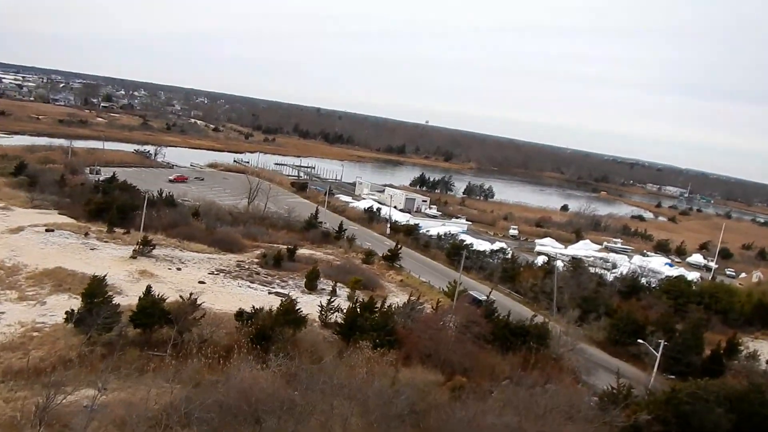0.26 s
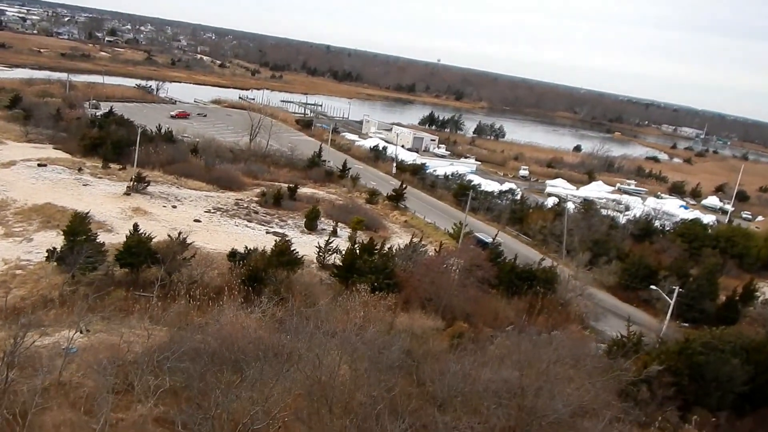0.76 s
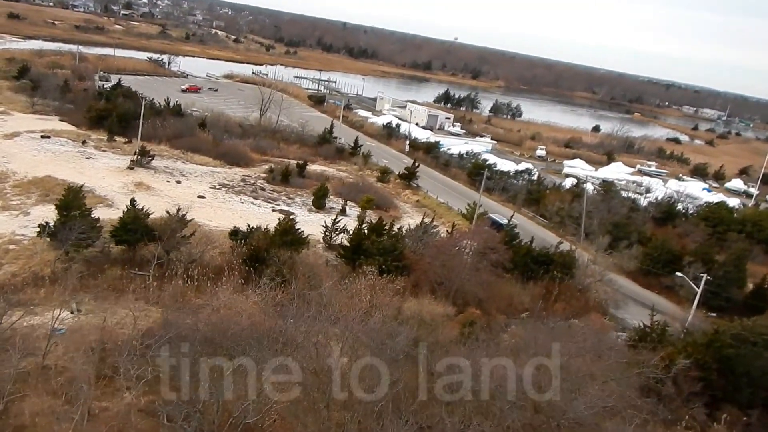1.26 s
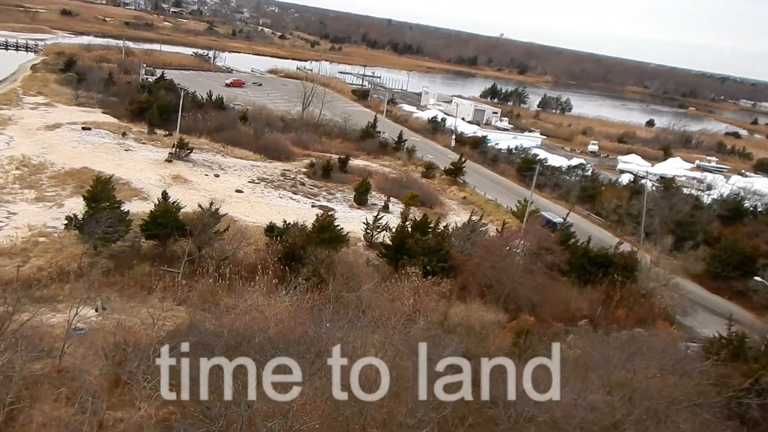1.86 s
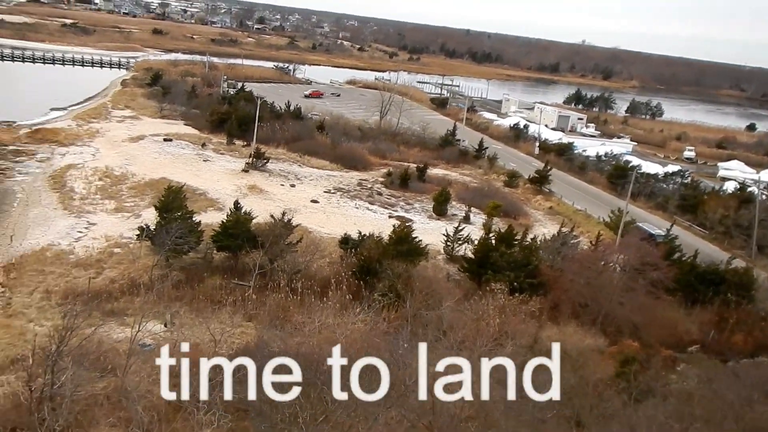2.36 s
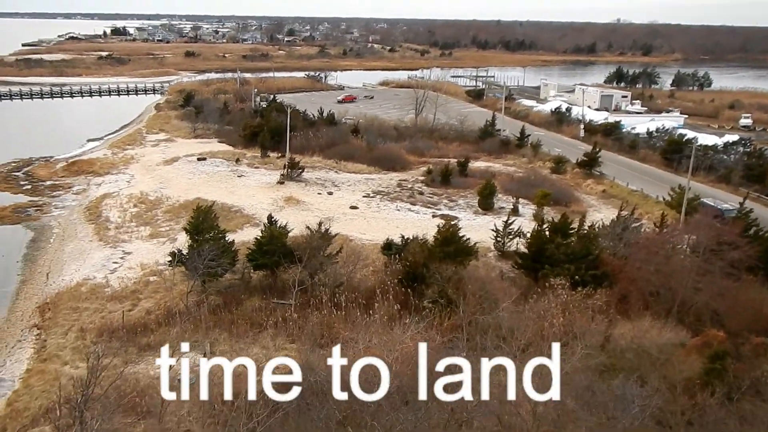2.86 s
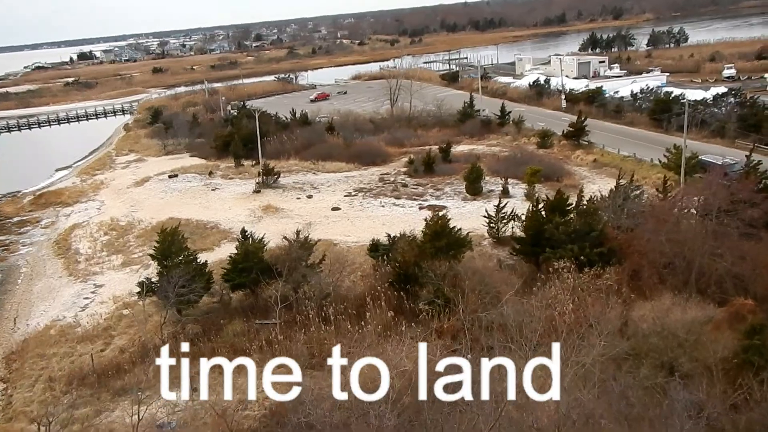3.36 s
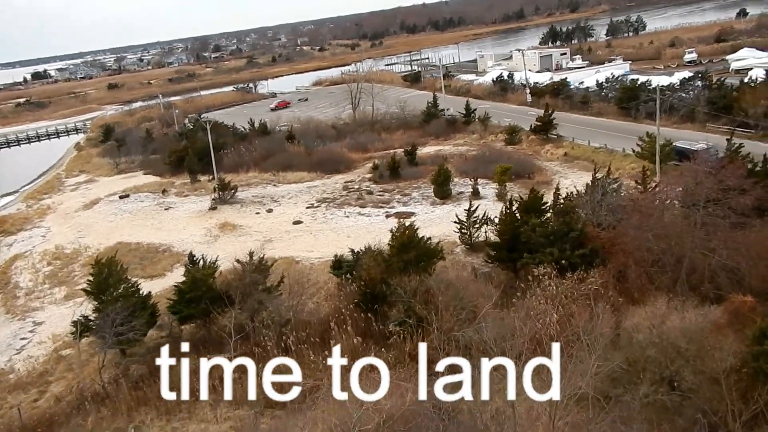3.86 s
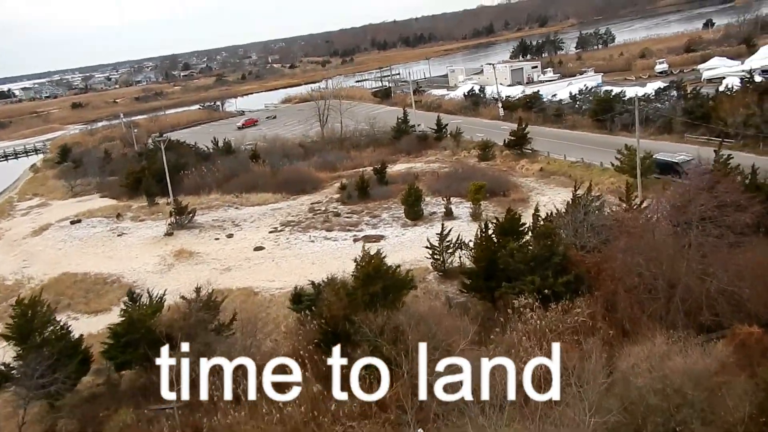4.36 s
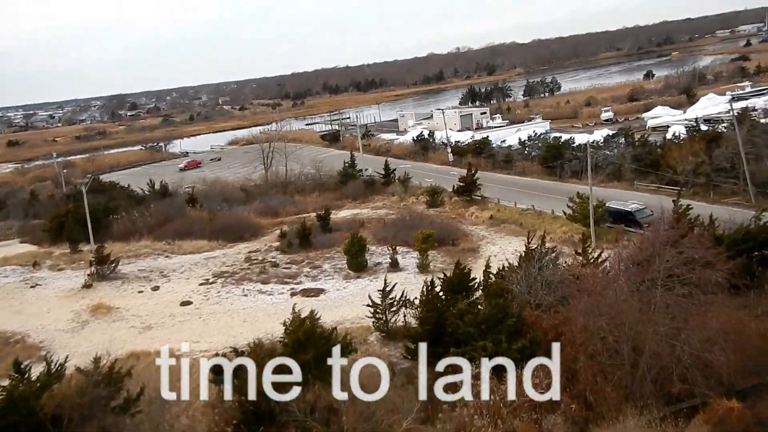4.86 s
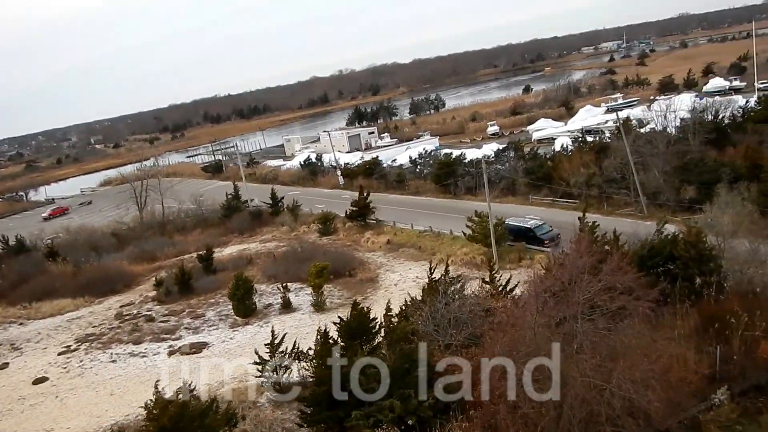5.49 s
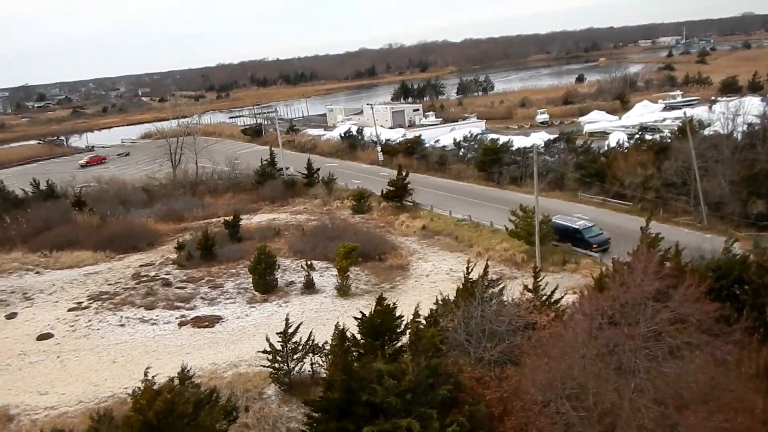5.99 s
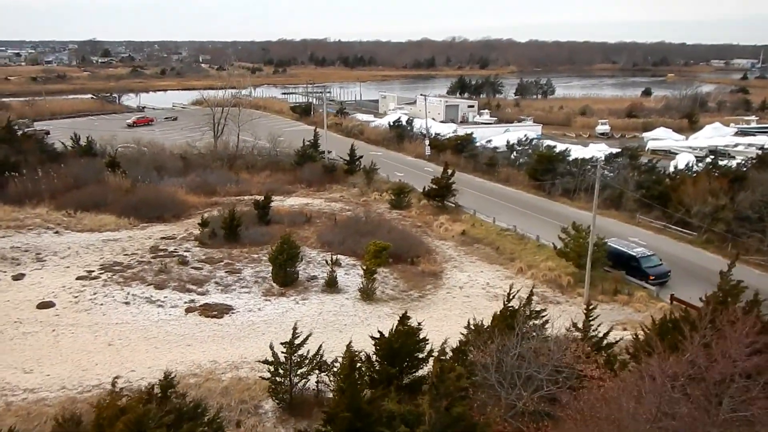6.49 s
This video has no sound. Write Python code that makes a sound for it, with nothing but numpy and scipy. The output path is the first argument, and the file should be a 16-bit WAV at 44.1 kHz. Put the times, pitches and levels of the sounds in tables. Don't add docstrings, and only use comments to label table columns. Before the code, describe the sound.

Close behind a boxed-in microphone outdoors, a small two-stroke engine idles unevenly, popping on every second or third turn with a hollow low exhaust note and loose-part rattle. Late on, metal buckles tick sharply and straps rustle. The engine is cut, its pumping slows and drops into low thumps and stops within half a second. A few hard clip knocks on the housing follow, over bare turbulent wind.

```python
import sys
import numpy as np
from scipy import signal
from scipy.fft import rfft, irfft
from scipy.io import wavfile
from scipy.ndimage import uniform_filter1d

SR = 44100
rng = np.random.default_rng(int(sys.argv[2]) if len(sys.argv) > 2 else 0)


def file_out(sig):
    cols = np.atleast_2d(sig).T
    lim = np.clip(cols, -1, 1)
    pcm = np.round(lim * 32767).astype(np.int16)
    wavfile.write(sys.argv[1], SR, pcm)


def boost(x):
    u = np.asarray(x, float) / 20
    return 10 ** u


N = 296773
TIME = np.arange(N) / SR
IDLE_HZ = 51.3
BREATH_LAG_S = .008

CATCHES = [1.275, 1.294, 1.333, 1.353, 1.411, 1.602, 1.64, 1.832, 2.046, 2.733, 3.206, 3.422, 3.973, 4.051,
           4.244, 4.304, 4.477]


def engine():
    angle = crank()
    fired, _, knock = firings().T
    strength_db = np.where(knock, 4.4, 4.9) + .7 * rng.standard_normal(len(fired))
    pops = train(fired, boost(strength_db))

    turns = TIME[1:][np.diff(np.floor(angle + 1e-6)) > 0]
    chance = rng.standard_normal((400, 4))[:len(turns)]
    since_cut = turns - fired[-1]

    missed = abs(turns[:, None] - fired).min(1) > .005
    last_fired = fired[np.maximum(np.searchsorted(fired, turns) - 1, 0)]
    waited = np.round((turns - last_fired) * IDLE_HZ).clip(1, 3)
    caught = abs(turns[:, None] - CATCHES).min(1) < .006
    weak_db = -9 + 9.5 * caught + 3 * (waited - 1) * (since_cut < 0)
    weak_db -= 161 * np.maximum(since_cut - 0.26, 0)
    weak = train(turns + .0002 * chance[:, 0], missed * boost(weak_db + 1.2 * chance[:, 1]))

    pump_db = np.interp(since_cut, [0, 0.1], [2, 6])
    pump_db -= 3 * (np.interp(turns, TIME, speed()) < .39)
    breaths = train(turns + BREATH_LAG_S + .0002 * chance[:, 2], boost(pump_db + 1.5 * chance[:, 3]))

    kicks = train(turns - .002, boost(-5 + 2.5 * chance[:, 1]))
    mechanical = clatter(kicks, pops)
    pipes = exhaust(pops + weak) + intake(breaths) + crankcase(breaths)
    pipes = pipes + hum(angle - 0.044) + boom(angle)
    return below(pipes * boost([[-.3], [.3]]), 3400) + mechanical


# time in seconds, rattle peak in dB.
KNOCKS = [(.0204, -21), (.0986, -21), (.1748, -22), (.3667, -15), (.462, -17), (.8476, -25), (.9053, -23),
          (.9821, -22), (1.058, -20), (1.196, -25), (1.431, -24), (1.5453, -24), (1.6608, -26),
          (1.9502, -22), (2.1254, -26), (2.3426, -20), (2.4199, -22), (2.4986, -26), (2.5771, -22),
          (2.7527, -27), (2.8475, -26), (3.0467, -18), (3.365, -23), (3.8996, -23), (3.9943, -24),
          (4.0718, -24), (4.1682, -20), (4.3247, -26), (4.4027, -20), (4.593, -22)]
SKIPS = [.0792, .5568, .6927, .751, 1.6222, 1.7943, 1.8526, 2.0269, 2.2633, 2.3031, 2.6742, 2.7135, 3.6821,
         3.722, 3.7618, 3.8016, 4.5542, 4.7074, 4.8049, 4.8809, 4.9204, 4.9993, 5.0588, 5.0982, 5.1749,
         5.2527, 5.4077]


def firings():
    listed = sorted([(s, 1) for s, _ in KNOCKS] + [(s, 0) for s in SKIPS])
    beat_turns = 3
    rows = [(listed[0][0], 2, 1)]
    for (a, knock), (b, next_knock) in zip(listed, listed[1:]):
        turns, last = round((b - a) * IDLE_HZ), rows[-1][1]
        rest_turns = 3 if knock else 2
        beats = range(turns - beat_turns, rest_turns - 1, -beat_turns)
        rows += [(a + (b - a) * k / turns, last + k, 0) for k in reversed(beats)]
        rows.append((b, last + turns, next_knock))
    return np.array(rows)


# time in seconds, crank speed in turns per s.
RUN_DOWN = [
    (5.408, 51.3),
    (5.48, 49.5),
    (5.55, 42),
    (5.63, 35.5),
    (5.72, 31),
    (5.78, 23.5),
    (5.85, 17.7),
    (5.95, 0),
]


def speed():
    return np.interp(TIME, *np.transpose(RUN_DOWN)) / IDLE_HZ


def crank():
    s, turns, _ = firings().T
    s, turns = np.r_[s[0] - 2 / IDLE_HZ, s], np.r_[0, turns]
    after = np.clip(np.searchsorted(s, TIME), 1, len(s) - 1)
    sag = 90 / 2 * np.maximum((TIME - s[after - 1]) * (s[after] - TIME), 0)
    coasted = np.cumsum((TIME > s[-1]) * speed() * IDLE_HZ) / SR
    return np.interp(TIME, s, turns) + sag + coasted


# frequency in Hz, width in Hz, level in dB, sign.
EXHAUST = [(297, 120, -23, -0.84), (436, 92, -7.5, -0.95), (552, 43.6, -15, 1), (597, 22.7, -16.5, -0.62),
           (856, 20, -30, 0.98), (1120, 80, -23, -0.84)]
# frequency in Hz, width in Hz, level in dB, sign.
SILENCER = [(118, 22, -30.5, 0.58), (131, 7.55, -10, -0.63)]


def exhaust(burns):
    pipe = ring(burns, EXHAUST, rise_s=.0022)
    return pipe + ring(np.roll(burns, -50), SILENCER, rise_s=0.0036, late_s=0.015)


# frequency in Hz, width in Hz, level in dB, sign.
INTAKE = [(70, 19, -25, 1), (122.4, 27, -12.5, 0.61), (260, 40, -23, 0.68)]


def intake(breaths):
    low = ring(breaths, INTAKE[:2], rise_s=0.007, late_s=0.011)
    return low + ring(breaths * speed() ** 3, INTAKE[2:], rise_s=0.006, late_s=0.011)


# frequency in Hz, width in Hz, level in dB, sign.
CRANKCASE = [(72, 17, -10, 0.59), (120.4, 27.5, -2, 0.99)]


def crankcase(breaths):
    return ring(breaths * (1 - speed()), CRANKCASE, rise_s=0.005, late_s=0.012)


# multiple of crank speed, level in dB.
ORDERS_DB = [(4, -40), (5, -26), (6, -26), (9, -39.5)]


def hum(angle):
    wobble = angle + .012 * drift(9.4)
    lines = sum(boost(db + 1.1 * drift(35)) * np.cos(2 * np.pi * k * wobble) for k, db in ORDERS_DB)
    return -np.sqrt(2) * lines * boost(1.54) * speed() ** 0.99


# frequency in Hz, width in Hz, level in dB.
BOOMS = [(275, 35, -28), (560, 60, -31)]


def boom(angle):
    share = speed()
    opened = np.clip((TIME - SKIPS[-1]) / .05, 0, 1) * np.clip((share - .4) / .2, 0, 1)
    lagged = angle - BREATH_LAG_S * share * IDLE_HZ
    out = 0
    for k in range(2, 15):
        swell = sum(boost(db) / (1 + ((k * share * IDLE_HZ - hz) / width) ** 2) for hz, width, db in BOOMS)
        out = out + swell * np.cos(2 * np.pi * k * lagged + .4 * k * k)
    return np.sqrt(2) * opened * out


# frequency in Hz, density in dB per Hz.
CLATTER = [(30, -42), (55, -30.5), (250, -36.5), (610, -32.5), (660, -40), (1150, -40.5), (1400, -46),
           (2200, -51), (2900, -66.5), (3900, -81.5), (5400, -57.5), (6600, -71), (8000, -100.5),
           (11500, -120)]


def clatter(kicks, pops):
    t = np.arange(1500) / SR
    puff = np.exp(-t / 0.005) * (1 - np.exp(-t / 0.0007)) ** 2
    slap = np.exp(-t / 0.0013) * (1 - np.exp(-t / 0.004))
    shaken = pops * boost(2.5 * np.clip(rng.standard_normal(N), -2, 1))
    kicks = kicks + np.roll(shaken, -90)

    whole = noise(CLATTER, patchy_db=0.5)
    treble = signal.sosfilt(signal.butter(4, 3600, "high", fs=SR, output="sos"), whole)
    body = below(whole, 700)
    gate = 0.56 + 0.56 * signal.oaconvolve(kicks, puff)[:N]
    slaps = 3.7 * treble * signal.oaconvolve(np.roll(kicks, 45), slap)[:N]
    mixed = .45 * body + (whole - body) * gate + slaps
    return below(mixed, 14000) * boost(-15) * (speed() + 0.006) ** 0.67


def harness():
    out = np.zeros((2, N + 3000))
    chance = rng.standard_normal((150, 3))
    for at, sound in rattles(chance) + buckles(chance) + clips():
        out[:, at:at + 3000] += sound
    return out[:, :N] + straps() + chime()


def rattles(chance):
    shaken = [(s, db, 0) for s, db in KNOCKS]
    shaken += [(s, -42, 0.83) for s, _, knock in firings() if not knock]
    return [tick(s - 0.00072, db + spread_db * c[0], 5430 + 48 * c[1], pan_db=-2.5, body_db=-30, t60=.025,
                 burst_s=.0032, air=.04, top_hz=9500, body_hz=1500)
            for (s, db, spread_db), c in zip(shaken, chance)]


# time in seconds, peak in dB,
# ring in Hz.
BUCKLES = [(.2319, -24, 4400), (.2862, -27, 4400), (1.168, -30, 2800), (4.6473, -27, 5750),
           (4.6757, -24, 2740), (4.7042, -18, 3060), (4.6615, -30, 6500), (4.726, -24, 5760),
           (4.7095, -22, 3000), (4.757, -23, 3050), (4.771, -24, 5800), (4.803, -16, 5290),
           (4.8553, -2, 6870), (5.1522, -23, 5220), (5.1721, -19, 3330), (5.243, -26, 5400),
           (5.4065, -20, 5800), (5.3487, -19, 5730), (5.4016, -14, 5240), (5.44, -19, 5260),
           (5.664, -24, 5500), (5.7832, -28, 5480), (5.8196, -25, 5390), (5.829, -24, 5500),
           (5.84, -25, 5700), (5.867, -24, 5400), (5.875, -23, 5700), (5.887, -24, 5600),
           (4.6568, -27, 6500), (4.7181, -16, 2000), (4.7321, -24, 5700), (4.7455, -20, 2030),
           (4.8125, -22, 6800), (4.9181, -21, 5340), (5.0962, -20, 5710), (5.2903, -22, 5420),
           (5.5671, -31, 5310), (5.631, -34, 5830), (5.719, -19, 900), (5.7487, -30, 5540),
           (5.9, -19, 1410), (5.9692, -26, 5300), (6.0085, -22, 5200), (6.038, -26, 6500),
           (6.478, -25, 800)]


def buckles(chance):
    return [tick(s, db, hz, pan_db=-.7 + 0.81 * c[2], body_db=-27, t60=.022, burst_s=.0011,
                 air=.055 * (hz / 6000) ** 3, top_hz=12500 if db > -5 else 9500)
            for (s, db, hz), c in zip(BUCKLES, chance)]


# time in seconds, peak in dB, ring in Hz, body level in dB, body in Hz.
CLIPS = [
    (4.7655, -11, 6050, -18, 2900),
    (4.8359, -12, 5940, -24, 3200),
    (5.1976, -11, 5760, -22, 2400),
    (5.222, -18, 5250, -20, 2600),
    (5.8561, -16, 5670, -29, 2800),
    (6.0148, -9, 5500, -30, 3400),
    (6.0166, -6.5, 5300, -19, 1800),
    (6.3914, -10, 4880, -17, 850),
    (6.3916, -17, 3500, -12, 1700),
    (6.3948, -19, 4700, -16, 1150),
]


def clips():
    return [tick(s, db, hz, pan_db=-1.5, body_db=body_db, t60=.019, burst_s=.0013,
                 air=.24 * (hz / 6000) ** 3, top_hz=9700, body_hz=body_hz)
            for s, db, hz, body_db, body_hz in CLIPS]


# frequency in Hz, density in dB per Hz.
RUSTLE = [(1400, -26), (2300, -1.5), (3050, -4.5), (3700, -10.5), (4400, -18), (5300, 1), (6300, -8.5),
          (8300, -23), (10200, -29), (12500, -75)]
# hold start in seconds, hold in seconds, level in dB,
# extra level of the part under 4 kHz in dB, release in dB per s.
STRAPS = [
    (4.71, 0.019, -40.5, 9.5, 121),
    (4.8, 0.097, -39, -13, 480),
    (5.182, 0.0083, -31, 1, 173),
    (5.409, 0.0075, -35, -6, 199),
    (5.86, 0.0096, -38.5, -5, 140),
    (5.953, 0.059, -39.5, -6.5, 503),
    (6.04, 0.094, -58.5, -10, 97),
    (6.22, 0.17, -48, -10, 400),
]


def straps():
    grain = evened(boost(2.8 * drift(250)))
    rub = noise(RUSTLE, patchy_db=3, apart=1.2)
    dull = signal.sosfiltfilt(signal.butter(4, 4000, fs=SR, output="sos"), rub)
    out = 0
    for s, hold, db, dull_db, release in STRAPS:
        rise_db = 171 * np.maximum(s - TIME, 0)
        stroke = boost(db - rise_db - release * np.maximum(TIME - s - hold, 0))
        out = out + (rub + dull * (boost(dull_db) - 1)) * grain * stroke
    return out


# start in seconds, rise in seconds, level in dB, frequency in Hz, t60 in seconds.
RINGS = [
    (5.391, .01, -22, 5230, .07),
    (6.392, .001, -27, 5100, .06),
]


def chime():
    out = 0
    for s, rise, db, hz, t60 in RINGS:
        t = np.maximum(TIME - s, 0)
        fade = boost(db - 60 * np.maximum(t - rise, 0) / t60)
        out = out + np.minimum(t / rise, 1) * fade * np.sin(2 * np.pi * hz * t)
    return out


# frequency in Hz, density in dB per Hz.
WIND = [(20, -24), (45, -15.5), (90, -4.5), (200, -10), (320, -13.5), (500, -20.5), (1500, -34),
        (2300, -38.5), (3100, -44), (4100, -57), (5400, -45), (6600, -57), (8300, -58), (11500, -100)]
# time in seconds, length in seconds, level over the calm in dB.
PUFFS = [
    (6.01, 0.03, 2),
    (6.192, .014, 6),
    (6.22, 0.03, 1),
    (6.303, 0.06, 2),
    (6.373, 0.02, 2),
    (6.1, .03, -2),
    (6.61, 0.02, 2),
    (6.44, .04, -3),
]


def wind():
    air = noise(WIND, patchy_db=1.2, apart=4)
    low = below(air, 700)
    lumps = evened(boost(0.32 * drift(30)))
    gust_db = sum(db * np.exp(-((TIME - s) / length) ** 2) for s, length, db in PUFFS)
    wash = np.sqrt(speed())
    buffet = low * lumps * boost(-24.5 + 3.5 * wash + gust_db)
    return buffet + evened(air - low) * boost(-40 + 1.5 * wash + .25 * gust_db)


NOTCH_HZ = 2533


def tick(s, db, hz, pan_db, body_db, t60, burst_s, air, top_hz, body_hz=2100):
    t = np.arange(3000) / SR
    burst = rng.standard_normal((3, 3000))
    fade = (1 - np.exp(-t / 0.00048)) * (np.exp(-t / burst_s) + 1.4 * boost(-60 * t / t60))
    burst = (burst[0] + 0.42 * burst[1:]) * fade
    bright = band(burst, hz * .87, hz * 1.13) + air * burst * [[.7], [1.2]]
    bright = band(bright, min(1500, hz / 2), top_hz)
    bright = signal.sosfilt(signal.butter(6, 1.1 * top_hz, fs=SR, output="sos"), bright)
    body = band(burst, .75 * body_hz, 1.3 * body_hz)
    sound = bright / abs(bright).max() + boost(min(body_db, -12) + 15.0) * body / abs(body).max()
    sound = signal.lfilter(*signal.iirnotch(NOTCH_HZ, 5, SR), sound)
    return round(s * SR), boost(db) * sound * boost([[pan_db / 2], [-pan_db / 2]])


# frequency in Hz, left-right likeness from 0 to 1.
SAME = [(30, 1), (60, .99), (120, 0.99), (240, 0.99), (490, 0.99), (970, 0.98), (1950, 0.85), (3920, 0.72),
        (7870, 0.98)]
# frequency in Hz, left over right in dB.
TILT = [(60, 0.0), (160, -0.5), (420, -0.5), (1120, -0.4), (2970, -0.45), (7870, -0.5)]


def noise(spectrum, patchy_db, apart=0.96):
    frames, hz = N // 256 + 5, np.fft.rfftfreq(1024, 1 / SR)
    a, b, c, d, patches = rng.standard_normal((frames, 513, 5)).T
    patches = evened(uniform_filter1d(uniform_filter1d(patches, size=10, axis=0), size=8, axis=1))
    same = np.clip(1 - apart * (1 - read(SAME, hz)), 0, 1)[:, None]
    left, tilt_db = a + 1j * b, read(TILT, hz)[:, None] / 2
    right = same * left + np.sqrt(1 - same ** 2) * (c + 1j * d)
    z = np.array([left * boost(tilt_db), right / boost(tilt_db)])
    dip_db = -10 * np.exp(-((hz - NOTCH_HZ) / 237) ** 2)
    z *= boost((read(spectrum, hz) + dip_db)[:, None] + patchy_db * patches)
    return evened(signal.istft(z, nperseg=1024, noverlap=768)[1][:, :N])


def ring(pulses, modes, rise_s, late_s=0):
    t = np.arange(-200, 6000) / SR
    swell = np.sin(np.pi / 2 * np.clip((t + rise_s) / (rise_s + late_s), 0, 1)) ** 2
    shape = 0
    for hz, width, db, sign in modes:
        shape = shape + sign * boost(db) * np.exp(-np.pi * width * abs(t)) * np.cos(2 * np.pi * hz * t)
    return signal.oaconvolve(pulses, swell * shape)[200:N + 200]


def train(s, size):
    return np.bincount(np.clip(np.round(s * SR).astype(int), 0, N - 1), size, N)


def drift(hz):
    z = rfft(rng.standard_normal(9600))
    z_hz = np.arange(len(z)) * SR / (32 * 9600)
    slow = irfft(z / (1 + (z_hz / hz) ** 4))
    return evened(np.interp(np.arange(N) / 32, np.arange(9600), slow))


def evened(x):
    return x / np.sqrt(np.mean(x ** 2) + 1e-20)


def read(points, hz):
    f, value = np.transpose(points)
    return np.interp(np.log(hz + 1), np.log(f + 1), value)


def below(x, edge_hz):
    padded = np.pad(x, [(0, 0), (127, 127)], "reflect")
    return signal.oaconvolve(padded, signal.firwin(255, edge_hz, fs=SR)[None], "valid")


def band(x, lo_hz, hi_hz):
    return signal.lfilter(*signal.butter(2, [lo_hz, hi_hz], "band", fs=SR), x)


def scene():
    return engine() + harness() + wind()


def low_pass(x):
    return signal.sosfilt(signal.butter(12, 15600, fs=SR, output="sos"), x)


def record(dry):
    treble = signal.sosfilt(signal.butter(4, 3000, "high", fs=SR, output="sos"), dry.mean(0))
    peak_db = 20 * np.log10(abs(treble) + 1e-6)
    fall = TIME * 13.8
    over_db = np.maximum(np.maximum.accumulate(np.maximum(peak_db + 11, 0) + fall) - fall, 0)
    pull = np.exp(-1 / (.006 * SR))
    ducked = dry / boost(signal.lfilter([1 - pull], [1, -pull], over_db))
    squeezed = ducked + below(np.tanh(ducked / 1.05) * 1.05 - ducked, 4000)
    closing = np.minimum((TIME[-1] - TIME) / .004, 1)
    dulled = closing * signal.sosfilt(signal.butter(2, 12000, fs=SR, output="sos"), squeezed)
    return low_pass(dulled)


dry = scene()
out = record(dry)
file_out(out)
```